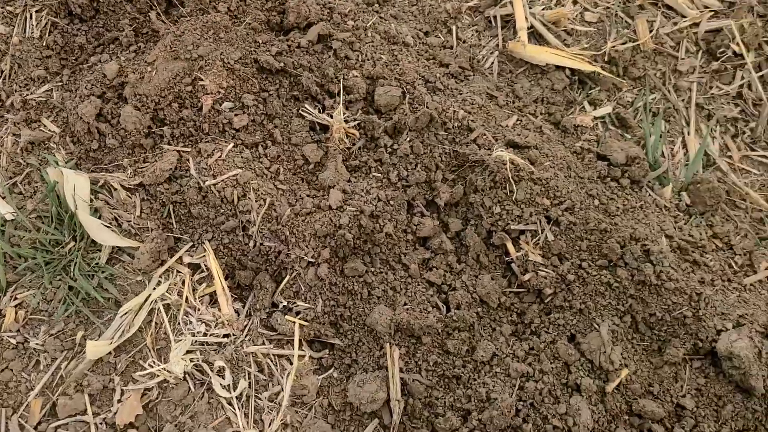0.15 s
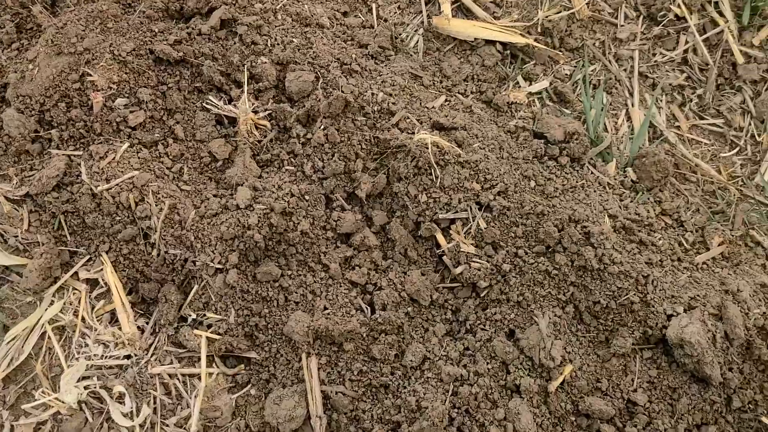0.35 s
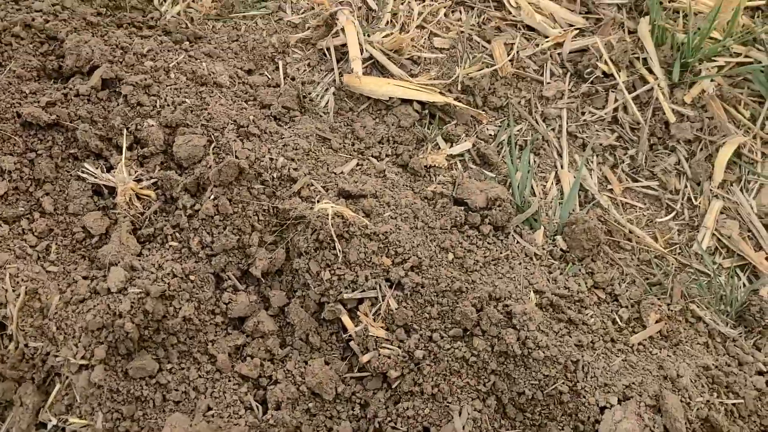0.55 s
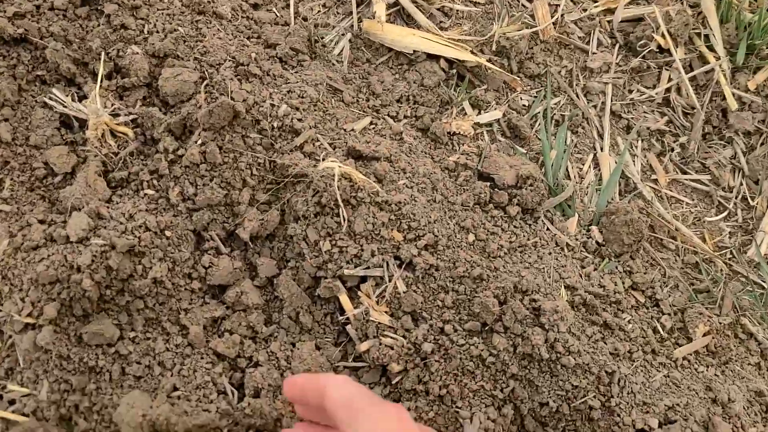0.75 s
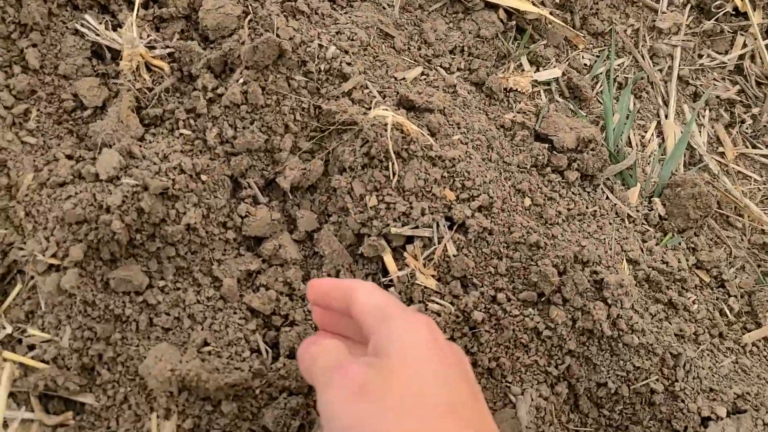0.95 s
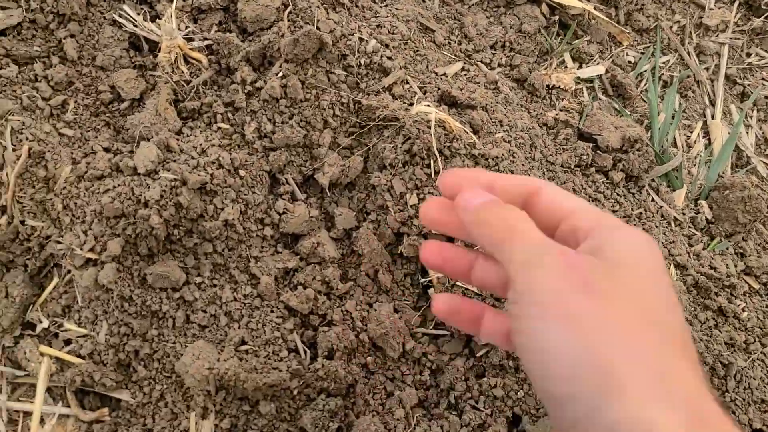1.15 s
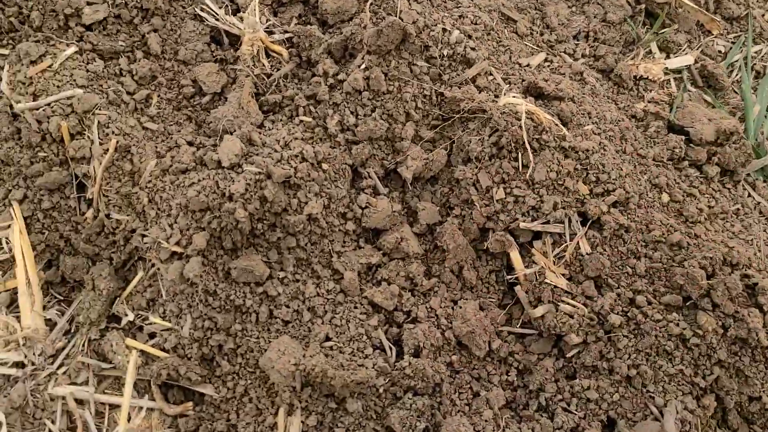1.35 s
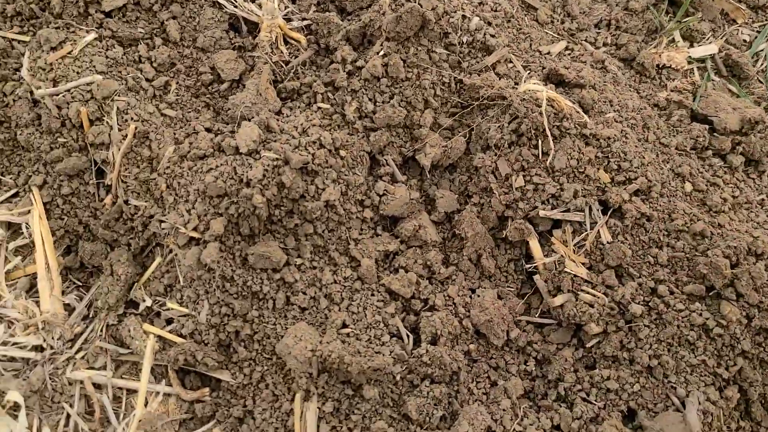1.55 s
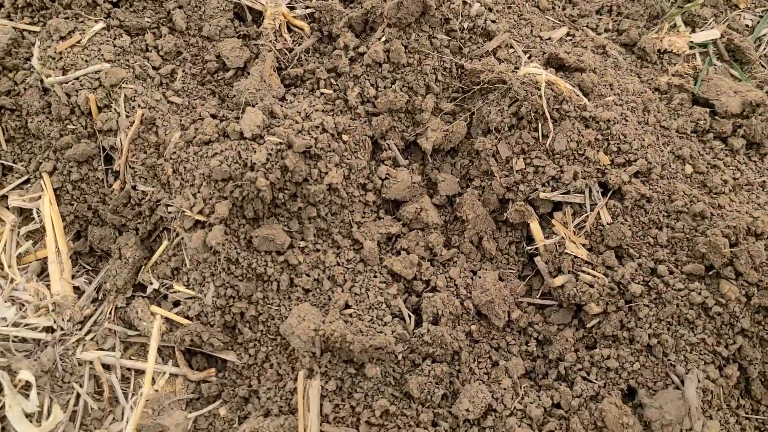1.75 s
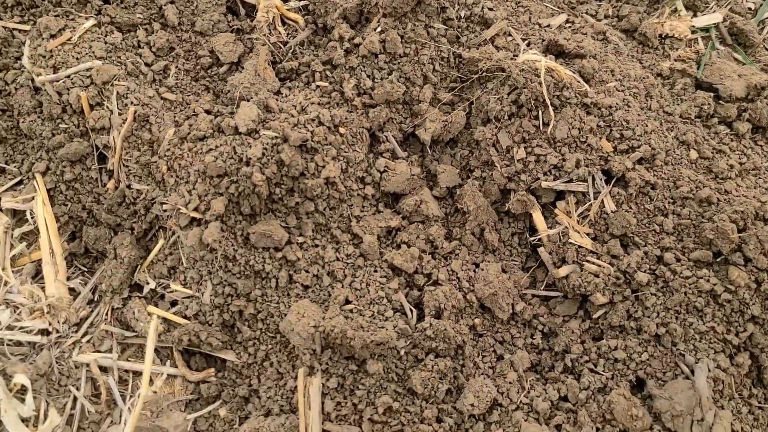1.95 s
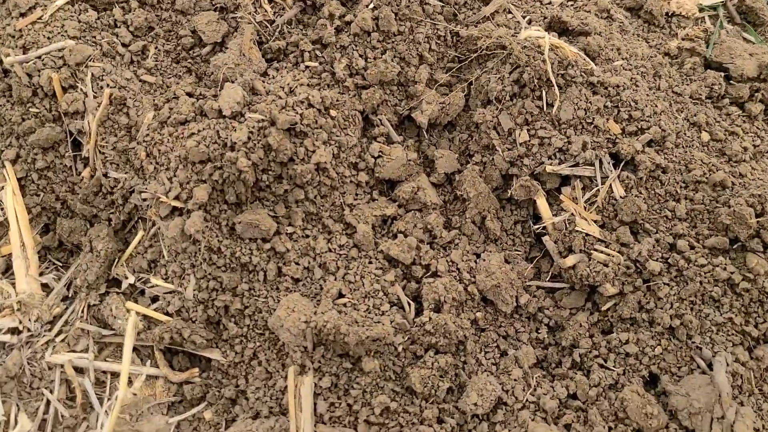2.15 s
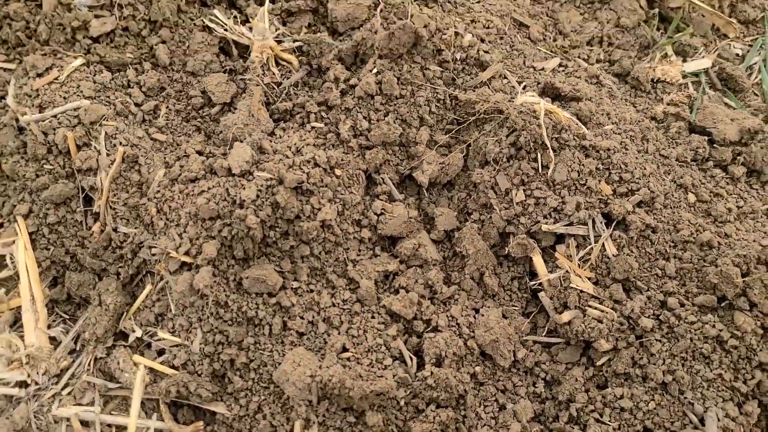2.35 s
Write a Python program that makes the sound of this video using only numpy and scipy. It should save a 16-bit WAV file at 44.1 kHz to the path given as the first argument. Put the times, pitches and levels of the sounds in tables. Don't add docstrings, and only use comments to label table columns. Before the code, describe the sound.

Steady diesel engine clatter with low hum and thin gear whine, outdoors on a handheld stereo phone; a hard wind thump comes early, then a short dry rustle with crisp ticks, over soft leaf hiss.

```python
import sys
import numpy as np
from scipy import signal
from scipy.fft import rfft, irfft
from scipy.io import wavfile
from scipy.ndimage import uniform_filter1d, map_coordinates

SR = 44100
rng = np.random.default_rng(int(sys.argv[2]) if len(sys.argv) > 2 else 0)


def pcm_store(signal):
    levels = np.round(np.clip(np.atleast_2d(signal), -1, 1) * 32767)
    wavfile.write(sys.argv[1], SR, levels.astype(np.int16).T)


def voltage_ratio(level):
    return 10 ** (np.asarray(level, float) / 20)


N = 110161
SHAFT_HZ = 22.5

# t/s, level/dB, right echo delay/ms, right echo/dB, left echo/dB
ATTITUDE = [(0, 1, 0.48, -6, -6), (.25, -1, 0.53, -5, -14), (.45, 0.5, 0.75, -12.5, -8.5),
            (.9, 0, 0.73, -11, -9.5), (1.22, -0.5, 0.63, -3.5, -10), (1.4, -5.5, 0.56, -5.5, -37),
            (1.7, -3.5, 0.39, -3.5, -37), (2.0, -3.5, 0.51, -3, -23), (2.3, -4, 0.52, -5, -39),
            (2.5, -1.5, 0.6, 0, -30)]
# t/s, leaves/dB, ports/dB
BREEZE = [(0, 10, -35.5), (.2, 7, -33), (.5, 0.5, -35.5), (.75, 2, -32.5), (1.15, 6, -35),
          (1.3, 5.5, -35.5), (1.5, 6.5, -39), (1.75, 5, -34.5), (1.9, 2.5, -34), (2.2, 4.5, -34.5),
          (2.5, 7.5, -31)]


def unit(x):
    return x / np.sqrt(np.mean(x ** 2))


def curve(table, col):
    a = np.array(table, float)
    return np.interp(np.arange(N) / SR, a[:, 0], a[:, col])


def colour(x, table):
    a = np.array(table, float)
    f_hz = np.arange(N // 2 + 1) * SR / N + 1
    gain_db = np.interp(np.log(f_hz), np.log(a[:, 0]), a[:, 1])
    return irfft(rfft(x) * voltage_ratio(gain_db), N)


def walk(rate_hz):
    k = int(SR / rate_hz)
    steps = np.repeat(rng.standard_normal(N // k + 1), k)
    return unit(uniform_filter1d(uniform_filter1d(steps, k), k)[:N])


def late(x, ms):
    return map_coordinates(x, [np.arange(N) - ms * SR / 1000], mode="mirror")


def pan(left_right_db):
    return voltage_ratio(np.array([[left_right_db], [-left_right_db]]) / 2)


def tone(hz, wobble_db, drift_rad=0.27):
    phase = 2 * np.pi * (hz * np.arange(N) / SR + rng.random()) + drift_rad * walk(5.4)
    return np.sqrt(2) * np.sin(phase) * voltage_ratio(wobble_db * walk(8.68))


def flicker(x, depth_db, rate_hz):
    spec = rfft(x)
    half_octave = 2 * np.log2(np.arange(N // 2 + 1) * SR / N + 1)
    out = 0
    for k in range(8, 29):
        band = irfft(spec * np.clip(1 - abs(half_octave - k), 0, 1), N)
        out = out + band * voltage_ratio(depth_db * walk(rate_hz))
    return out


def hum():
    exhaust = [(2, 0), (3, 0)]
    # f/Hz, level/dB
    fan_tones = [(95.0, -0.5), (190.0, -21.5)]
    # t/s, fan/dB, second order/dB, third order/dB
    path = [(0.0, -35.5, -20, -21.5), (0.05, -28, -39, -29.5), (0.25, -22, -34, -27),
            (0.49, -31, -34.5, -32), (0.63, -24.5, -37, -33.5), (0.72, -27, -25.5, -24),
            (0.99, -24, -28, -37.5), (1.06, -21, -32, -42), (1.19, -26, -35, -28.5), (1.4, -32, -50, -40),
            (1.46, -24, -37, -39), (1.56, -31, -41, -24), (1.63, -26.5, -56, -40),
            (1.72, -25.5, -34, -29.5), (1.92, -23, -28.5, -24.5), (2.07, -29.5, -42, -38),
            (2.29, -22.5, -32.5, -28), (2.5, -26, -28, -24.5)]
    out = sum(voltage_ratio(db) * tone(hz, 0.46) for hz, db in fan_tones) * voltage_ratio(curve(path, 1))
    for order, db in exhaust:
        out = out + voltage_ratio(db + curve(path, int(order))) * tone(order * SHAFT_HZ, 0.5)
    return out


def whine():
    gears = [(20, -56), (24, -52), (38, -50), (41, -80), (54, -52), (59, -57), (61.4, -55.5), (71, -51.5),
             (74, -53), (76.1, -54.5), (108.1, -56)]
    return sum(voltage_ratio(db) * tone(order * SHAFT_HZ, 3.1, 2.22) for order, db in gears)


def clatter():
    level_db, repeat = -33, 0.25
    rattle_db, knock_depth, knock_hz = 1, 0.42, 2510
    # f/Hz, level/dB per Hz
    spectrum = [(150, 2.5), (330, -10), (800, 5), (1500, -1), (2250, -7.5), (3300, -14), (5000, -22),
                (14000, -33)]
    # f/Hz, width/Hz, level/dB
    cover = [(516, 140, 2), (1216, 230, 1.5), (1480, 91, -2.5), (1710, 133, 3), (3020, 72, 12),
             (3180, 91, 11), (6170, 135, 3)]
    turn = int(SR / SHAFT_HZ)
    rows = rng.standard_normal((N // turn + 1, turn))
    rows = signal.lfilter([1], [1, -repeat], rows, axis=0)
    source = colour(rows.ravel()[:N], spectrum)
    noise = source
    for hz, width_hz, db in cover:
        ring = signal.lfilter(*signal.iirpeak(hz, hz / width_hz, SR), source)
        noise = noise + voltage_ratio(db + rattle_db * walk(13.97)) * ring
    angle = 2 * np.pi * SHAFT_HZ * np.arange(N) / SR
    knock = knock_depth * (np.sin(angle) + np.sin(2 * angle) + np.sin(3 * angle)) / 2
    noise = noise + knock * signal.lfilter(*signal.butter(1, knock_hz, "high", fs=SR), noise)
    return voltage_ratio(level_db) * flicker(unit(noise), 1.64, 14.17)


def wind():
    breeze_db, flutter_db, shared = 3, 1.5, 0.4
    puff_db, leak_db = 3, -15
    # f/Hz, level/dB per Hz
    port_spectrum = [(16, -18), (30, -11), (48, -7), (80, -6), (120, -10), (200, -15.5), (320, -27),
                     (900, -60.5)]
    # f/Hz, level/dB per Hz
    puff_spectrum = [(18, -9.5), (45, 10), (100, 0.5), (200, -9), (350, -19), (700, -31), (1500, -58)]
    # peak t/s, level/dB, length/s, port (0 left, 1 right)
    puff_events = [(0.015, -22.5, 0.02, 1), (0.21, -25.5, 0.14, 1), (0.33, -28, 0.087, 1),
                   (.38, -25.5, 0.065, 1), (0.734, -21.5, 0.058, 1), (0.903, -27, 0.23, 1),
                   (1.074, -25.5, 0.068, 1), (1.17, -31.5, 0.16, 1), (1.354, -32, 0.044, 1),
                   (1.726, -25.5, 0.19, 1), (1.896, -23, 0.054, 1), (1.972, -19.5, 0.05, 1),
                   (2.092, -32, 0.17, 0), (2.23, -26, 0.13, 1), (2.441, -23, 0.089, 1),
                   (2.49, -28.5, 0.053, 1)]
    t = np.arange(N) / SR
    both = rng.standard_normal(N)
    breezes, puffs = [], []
    for port in range(2):
        raw = np.sqrt(shared) * both + np.sqrt(1 - shared) * rng.standard_normal(N)
        gusty = raw * voltage_ratio(curve(BREEZE, 2) + flutter_db * walk(16))
        breezes.append(voltage_ratio(breeze_db) * colour(gusty, port_spectrum) / np.std(colour(raw, port_spectrum)))
        eddy = colour(rng.standard_normal(N), puff_spectrum)
        power = uniform_filter1d(uniform_filter1d(eddy ** 2, size=1200), size=1200)
        eddy = eddy / np.sqrt(power)
        shape = sum(voltage_ratio(db) * np.exp(-(2 * (t - s) / length_s) ** 2)
                    for s, db, length_s, at in puff_events if round(at) == port)
        puffs.append(voltage_ratio(puff_db) * eddy * shape)
    puffs = np.array(puffs)
    return np.array(breezes) + puffs + voltage_ratio(leak_db) * puffs[::-1]


def thumps():
    eddies = [
        (.728, -4.5, 58),
        (.748, -12, 55),
        (1.065, -16, 85),
        (2.4845, -12, 75),
        (2.4995, -11, 55),
    ]
    t = np.arange(N) / SR
    dips = 0
    for s, db, hz in eddies:
        square = (np.pi * hz * (t - s)) ** 2
        dips = dips + voltage_ratio(db) * (2 * square - 1) * np.exp(-square)
    return dips * voltage_ratio(np.array([[-14], [0]]))


def ticks():
    t60_s, noise_share = 0.008, 0.12
    # t/s, peak/dB, f/Hz, L-R/dB, width/octaves
    snaps = [(.0812, -32, 11000, 3, 1.5), (0.082, -30, 11800, 4, 0.33), (.1560, -29, 3230, 0, 0.59),
             (.4428, -40, 4500, -2, 1.2), (0.4868, -24, 4400, 11, 1.36), (1.1885, -40, 4000, 0, 1.2),
             (1.259, -24, 8400, -7, 1.34), (1.488, -40, 8060, -7, 1.2), (1.5625, -37, 4500, 0, 1.2),
             (1.582, -40, 14000, 5, .4), (1.655, -35, 14500, 3, .4), (1.674, -41, 12000, 3, .4),
             (1.680, -34, 4500, 5, 1.2), (1.726, -34, 14500, 3, .4), (1.7665, -23, 11600, 6, 0.67),
             (1.771, -39, 6000, 8, 1.2), (1.776, -28, 13000, 8, 0.63), (1.788, -31, 14000, 3, .6),
             (1.792, -31, 11400, 3, 0.54), (1.9722, -47, 4000, -4, 1.2), (2.0835, -46, 4000, -4, 1.2),
             (2.1064, -41, 4000, -4, 1.2), (2.131, -42, 5000, -3, 1.2), (2.141, -34, 10000, 3, 1.2),
             (2.2095, -33, 6000, 1, 2), (2.299, -44, 7000, 0, 1.4), (2.3546, -22, 8300, 15, 2)]
    out, t = np.zeros((2, N)), np.arange(600) / SR
    for s, db, hz, pan_db, width_oct in snaps:
        edges_hz = hz * 2 ** (np.array([-.5, .5]) * max(width_oct, .1))
        b, a = signal.butter(2, np.clip(edges_hz, 500, 19000), "band", fs=SR)
        strike = (t == 0) + noise_share * rng.standard_normal(len(t))
        tick = signal.lfilter(b, a, strike * np.exp(-t * np.log(1000) / t60_s))
        i = int(s * SR)
        out[:, i:i + len(t)] += tick / abs(tick).max() * voltage_ratio(db) * pan(pan_db)
    return out


def rustle():
    grains_per_s, scatter_db, hiss, pan_db = 6000, 1.2, 1.2, 2
    # t/s, level/dB
    strokes = [(0, -58), (.16, -54), (.25, -76), (.45, -46), (.55, -59), (1.4, -64), (1.6, -47),
               (1.65, -40), (1.68, -34.5), (1.715, -40.5), (1.77, -39), (1.8, -40.5), (1.84, -77),
               (2.1, -62), (2.15, -48), (2.22, -68), (2.5, -77)]
    hits = rng.random((2, N)) < grains_per_s / SR
    grains = hits * rng.standard_normal((2, N)) * voltage_ratio(scatter_db * rng.exponential(size=(2, N)))
    grains = unit(grains) + hiss * rng.standard_normal((2, N))
    brush = colour(grains, [(200, 12), (900, -3), (3500, 5.5), (7000, -4), (14500, -3.5)])
    return unit(brush) * voltage_ratio(curve(strokes, 1)) * pan(pan_db)


def field(lag_ms):
    level_db, pan_db, shared = -48, -3.5, 0.75
    # f/Hz, level/dB per Hz
    spectrum = [(200, -13.5), (700, -3), (1500, -4.5), (2500, -2), (4000, -9.5), (6500, -21.5),
                (11000, -26), (16000, -28)]
    far, left, right = (flicker(unit(colour(rng.standard_normal(N), spectrum)), 2.0, 16.0)
                        for _ in range(3))
    leaves = np.sqrt(shared) * np.array([late(far, lag_ms), far])
    leaves = leaves + np.sqrt(1 - shared) * np.array([left, right])
    return voltage_ratio(level_db + curve(BREEZE, 1)) * pan(pan_db) * leaves


def scene():
    echo_top_hz, left_db, left_top_db, left_echo_ms = 2430, -2.5, -0.5, 0.41
    # t/s, delay/ms
    turning = [(0, .53), (.25, .52), (.5, .525), (.9, .51), (.97, .487), (1.14, .487), (1.22, .52),
               (1.5, .525), (2.0, .515), (2.3, .51), (2.38, .487), (2.5, .487)]
    lag_ms = curve(turning, 1)
    low = hum()
    high = (clatter() + whine()) * voltage_ratio(curve(ATTITUDE, 1))
    dull = signal.sosfilt(signal.butter(1, echo_top_hz, fs=SR, output="sos"), high)
    right_echo = voltage_ratio(curve(ATTITUDE, 3)) * late(dull, curve(ATTITUDE, 2))
    right = voltage_ratio(-0.05) * low + high + right_echo
    shaded = voltage_ratio(left_db) * dull + voltage_ratio(left_top_db) * (high - dull)
    left_echo = voltage_ratio(curve(ATTITUDE, 4)) * late(dull, lag_ms + left_echo_ms)
    left = late(voltage_ratio(-0.4) * low + shaded, lag_ms) + left_echo
    return np.array([left, right]) + wind() + thumps() + ticks() + rustle() + field(lag_ms)


def band_limit(x):
    return signal.sosfilt(signal.butter(12, 16000, fs=SR, output="sos"), x)


def record(dry):
    x = signal.sosfilt(signal.butter(2, 26, "high", fs=SR, output="sos"), dry)
    x = signal.sosfilt(signal.ellip(10, .2, 60, 15750, fs=SR, output="sos"), x)
    return band_limit(x)


dry = scene()
out = record(dry)
pcm_store(out)
```